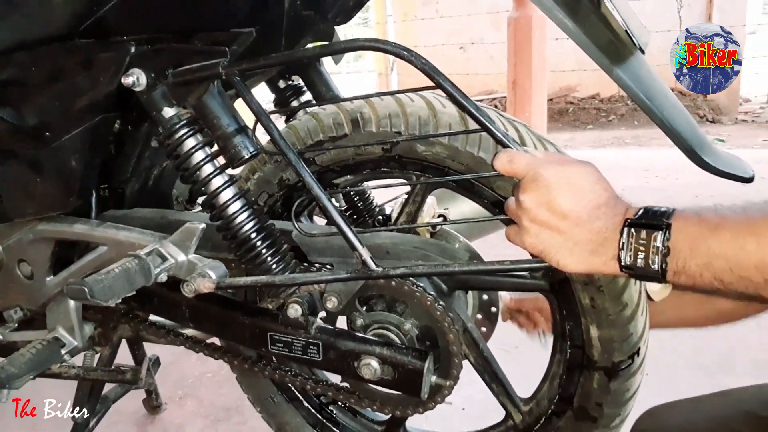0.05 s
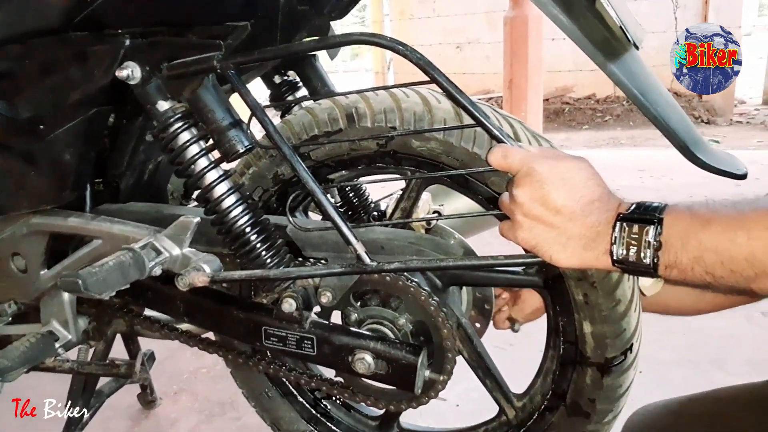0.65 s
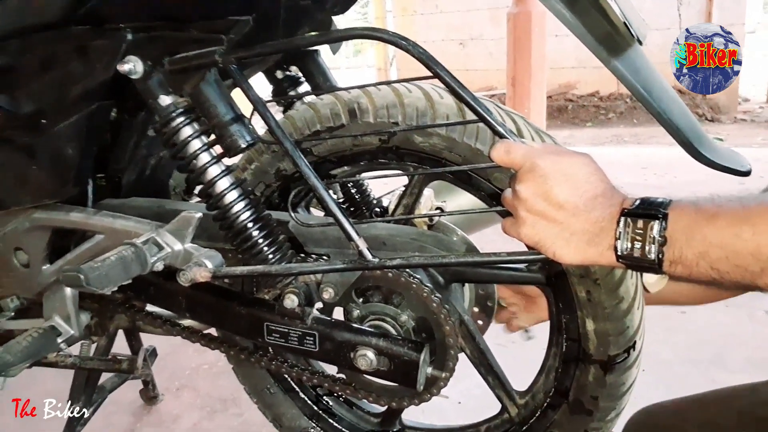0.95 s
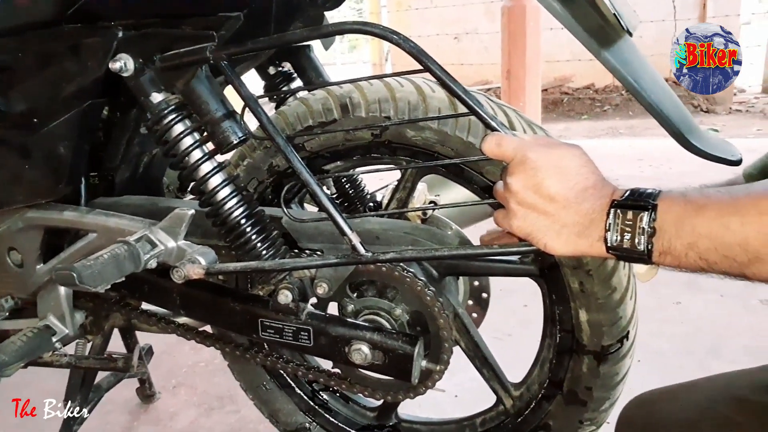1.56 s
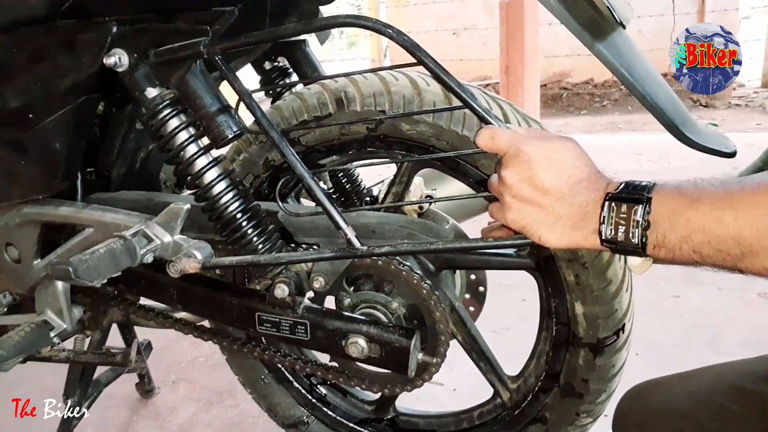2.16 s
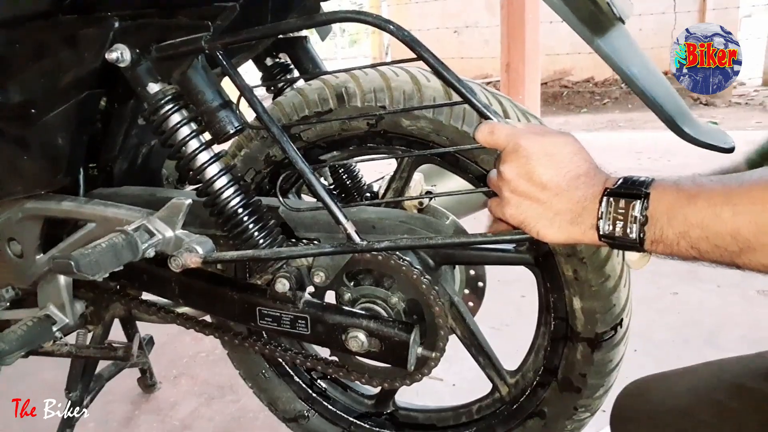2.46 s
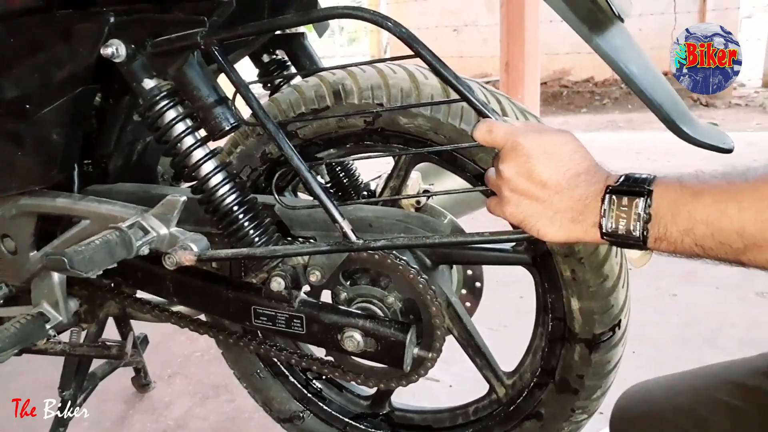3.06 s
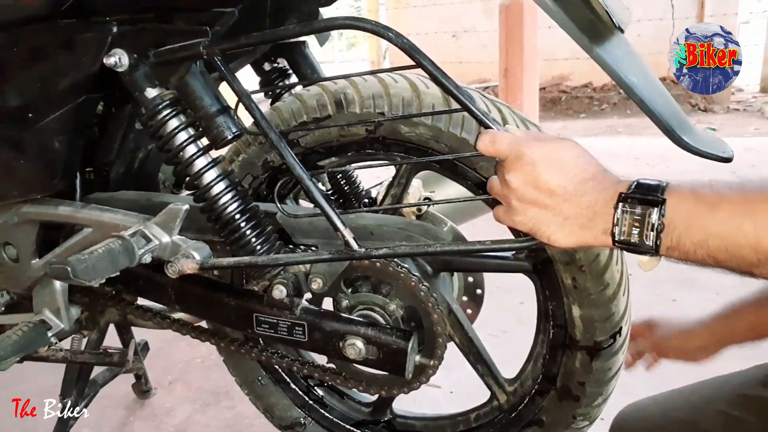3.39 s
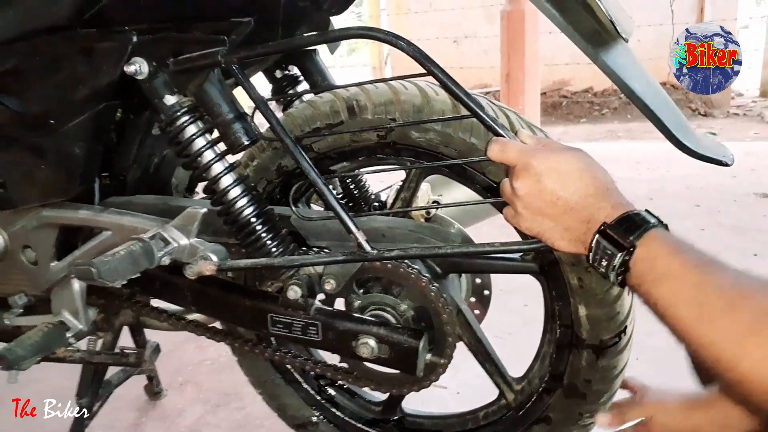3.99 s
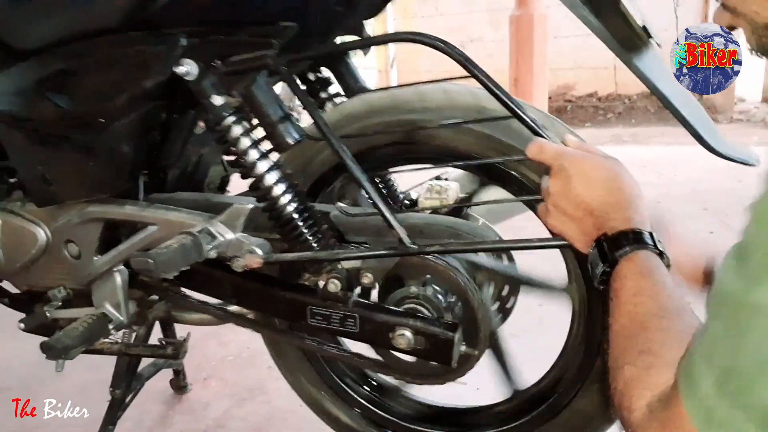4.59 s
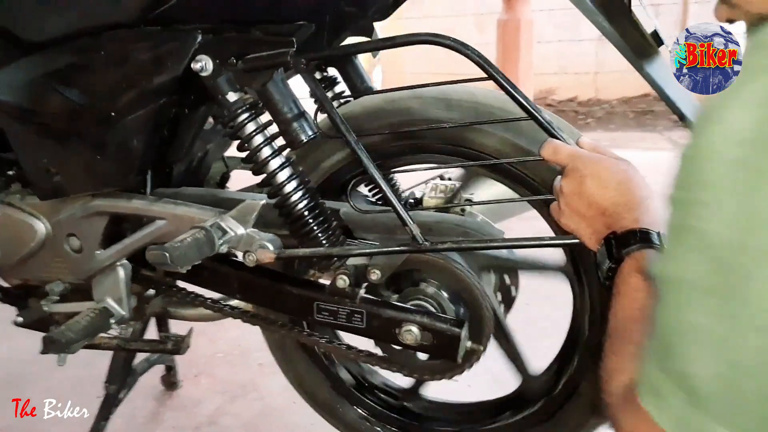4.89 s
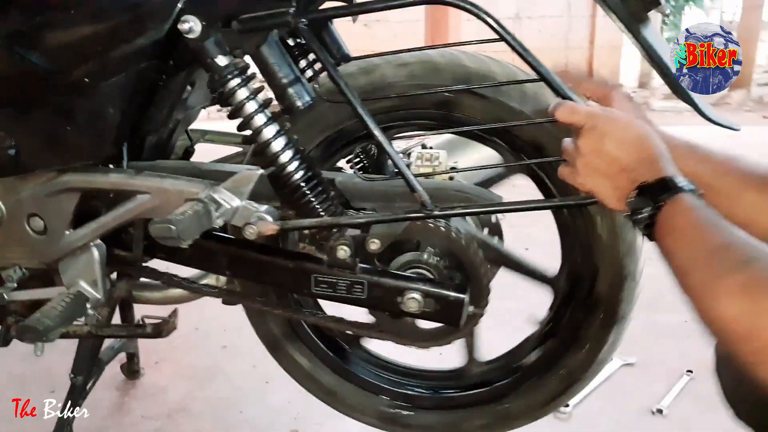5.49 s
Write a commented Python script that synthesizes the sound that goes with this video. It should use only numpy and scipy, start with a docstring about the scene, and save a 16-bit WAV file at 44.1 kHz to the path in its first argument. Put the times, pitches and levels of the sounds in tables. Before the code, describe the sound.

A low rumble of street traffic runs throughout and gradually swells, with a faint motor idling somewhere beyond a yard with a short echo. Close by, small steel parts of a motorcycle's brake linkage give light, dry clicks: two just after 1 second, a quick cluster at 1.4, one at 1.6 and a fainter one at 2.4. A soft, brief hollow tone passes at about 2 seconds. At 2.9 seconds a spanner drops against another on concrete; both chatter and ring high and bright, with a slight gritty scrape, settling by about 3.6. The traffic dips briefly as it lands, then swells again. From about 4.1 seconds the rear wheel is spun by hand and the chain runs over the sprocket, building to full speed at 5 seconds. This low, rasping, fluttering whirr, with the metalwork droning along, is the loudest sound and continues to the end near 5.6 seconds.

```python
"""Street traffic rumbles, small metal parts click, a dropped spanner rings, then a chain whirrs.
A motorcycle stands in an echoing yard beside the street, and a motor idles somewhere beyond.
Fingers work at the rear brake linkage, whose steel parts click. One spanner falls against
another on the concrete and both ring. Then the rear wheel is spun by hand: the chain runs over
the sprocket (the toothed wheel), shaking the swing arm and chain guard."""
import sys
import numpy as np
from scipy import signal
from scipy.fft import rfft, irfft, next_fast_len
from scipy.io import wavfile

SR = 44100
rng = np.random.default_rng(int(sys.argv[2]) if len(sys.argv) > 2 else 0)


def file_out(sig):
    """Save sig as 16-bit WAV at sys.argv[1]."""
    # one column per channel
    cols = np.atleast_2d(sig).T
    # limit, then scale
    lim = np.clip(cols, -1, 1)
    pcm = np.round(lim * 32767).astype(np.int16)
    wavfile.write(sys.argv[1], SR, pcm)


N = 244314
TIME = np.arange(N) / SR
FREQ = np.maximum(np.fft.rfftfreq(N, 1 / SR), 1)


def amp(db):
    """Turn decibels into a gain to multiply by."""
    return 10 ** (np.asarray(db) / 20)


def unit(x):
    """Scale a signal to an average strength (rms) of 1."""
    return x / np.sqrt(np.mean(x ** 2))


def response(points):
    """A gain for every frequency, drawn through points of f/Hz, gain/dB."""
    hz, db = np.transpose(points)
    return amp(np.interp(np.log(FREQ), np.log(hz), db))


def shape(x, gain):
    """Filter a sound with one gain for each frequency."""
    return irfft(rfft(x) * gain, N)


def brighten(x, db, corner_hz=900):
    """Raise or lower the treble by an amount that may change over time."""
    return x + (amp(db) - 1) * shape(x, 1 / (1 + (corner_hz / FREQ) ** 2))


def noise():
    """Two unrelated white noises."""
    return rng.standard_normal((2, N))


def wander(rate_hz):
    """A smooth random curve of typical size 1; a higher rate makes it move faster."""
    size = next_fast_len(N, real=True)
    smooth = np.exp(-(np.fft.rfftfreq(size, 1 / SR) / rate_hz) ** 2)
    return unit(irfft(rfft(rng.standard_normal(size)) * smooth, size)[:N])


def ramp(start, length):
    """Rise in a straight line from 0 to 1, then stay there."""
    return np.clip((TIME - start) / length, 0, 1)


def decay(start, t60):
    """The loudness of a blow: it jumps up, then fades by 60 dB every t60 seconds."""
    age = TIME - start
    return (age >= 0) * amp(-60 * np.clip(age / t60, 0, 4))


def ring(start, hz, t60):
    """One fading tone of a struck object."""
    return np.sqrt(2) * np.sin(2 * np.pi * hz * (TIME - start)) * decay(start, t60)


def resonate(x, bands):
    """Pick narrow humming bands out of a sound, each at its own level."""
    return sum(amp(db) * unit(shape(x, 1 / (1 + ((FREQ - hz) / width) ** 2))) for hz, width, db in bands)


def pan(db):
    """Left and right gains, with the left louder by db."""
    return amp(np.array([[db], [-db]]) / 2)


def spread(pair):
    """Turn two unrelated sounds into stereo: bass alike in both ears, treble all around."""
    # stereo width: f/Hz, side minus mid/dB
    widths = [(60, -24), (125, -23), (250, -13), (500, -6.5), (1000, 0.5), (2000, 0.5), (12000, 0)]
    # lean to one ear: f/Hz, left minus right/dB
    leans = [(60, -1.2), (250, -1.2), (500, 2.2), (1000, -.4), (2000, -1.5), (12000, 0)]
    width, lean = response(widths), np.sqrt(response(leans))
    mid, side = shape(pair, np.array([np.ones_like(width), width]) / np.hypot(1, width))
    return shape(np.array([mid + side, mid - side]), np.array([lean, 1 / lean]))


def yard(x, t60, echo_db, delay_s=0.0098):
    """House walls send back a short, blurred echo."""
    tail = noise() * decay(delay_s, t60)
    tail /= np.sqrt(np.sum(tail ** 2, axis=1, keepdims=True))
    return x + amp(echo_db) * signal.fftconvolve(x, tail, axes=1)[:, :N]


def motor(fade_db_per_s=-1.5):
    """A motor idles beyond the yard; its hum slowly fades behind the traffic."""
    # the motor's hum: f/Hz, half width/Hz, starting level/dB
    hums = [(82.5, 1.5, -40.5), (332, 2, -50.5)]
    return spread(resonate(noise(), hums)) * amp(fade_db_per_s * TIME)


def street(swell_db_per_s=3.5, boom_db_per_s=1.0, treble_db_per_s=0.92, swell_end_s=4.1,
           drop_s=2.96, boom_return_s=0.31, boom_hz=110):
    """Traffic rumble swells, drops once just after the spanner lands, and swells on."""
    # tone colour of the traffic: f/Hz, gain/dB
    colour = [(25, -28), (48, -10), (70, 3.5), (105, 1), (170, -3), (300, -8.5), (600, -15.5),
              (1250, -23.5), (2000, -33), (2800, -36.5), (4000, -47), (5500, -47.5), (12500, -61.5),
              (15500, -74)]
    # hum of a distant engine: f/Hz, half width/Hz, level against the rumble/dB
    engine_hum = [(82.1, 4.7, -7), (253.6, 2.4, -12), (332.9, 3.5, -15), (387.8, 6.2, -19), (509, 47, -18),
                  (682, 4, -23)]
    elapsed = np.minimum(TIME, swell_end_s)
    drop_db = 5.5 * ramp(drop_s, 0.033)
    upper_db = -38 + swell_db_per_s * elapsed - drop_db
    # the deep boom swells less and comes back soon after the drop
    boom_dip_db = drop_db * np.exp(-((TIME - drop_s) / boom_return_s) ** 2)
    boom_db = -39.5 + boom_db_per_s * elapsed - boom_dip_db
    rumble = unit(shape(noise(), response(colour))) + resonate(noise(), engine_hum)
    deep = shape(rumble, 1 / (1 + (FREQ / boom_hz) ** 8))
    upper = brighten(rumble - deep, treble_db_per_s * elapsed) * amp(upper_db)
    boom = deep * amp(boom_db + 1.5 * wander(rate_hz=3))
    return spread((upper + boom) * amp(0.5 * wander(rate_hz=14)))


def hollow_note():
    """A soft, hollow note comes and goes while the fingers work."""
    # the note: middle t/s, half length/s, f/Hz, half width/Hz, level/dB
    note = (2, 0.1, 542, 22, -37.5)
    middle, length, hz, width, db = note
    return spread(resonate(noise(), [(hz, width, db)])) * np.exp(-((TIME - middle) / length) ** 2)


def steel_clicks(knee_hz=2700, rebound_s=0.0035, rebound_db=-4, rise_s=0.0018, echo_t60=0.48):
    """Small steel parts click and rebound once: a dry crack and a short, damped ring."""
    # clicks of the brake linkage; the last is the spanner's light first touch before it rings:
    # t/s, level/dB, treble tilt/dB per octave, left minus right/dB, crack t60/s,
    # ring level/dB, ring length/share of the undamped ring
    clicks = [(0.004, -52, 1.5, -4.5, 0.48, -26, 1), (1.0735, -28.5, -5, 1.5, 0.045, -1, 1),
              (1.138, -28, 0, -1.5, 0.04, 2.5, 1), (1.380, -41, 1, -1, 0.045, 0, .8),
              (1.3945, -24, -7, 2, 0.032, -8, .4), (1.400, -35.5, 0, -5, 0.025, 2.5, .7),
              (1.6355, -35, 12, 0, 0.055, 4.5, .8), (2.397, -41, 0, -7, 0.07, -3, .6),
              (2.893, -41, 1, -10, 0.065, -10, .6)]
    # tone colour of a crack: f/Hz, gain/dB
    crack_colour = [(300, -5), (700, -1), (1150, 1), (1650, 5), (2000, -1), (2550, .5), (3400, -8),
                    (3950, -21), (4730, -7), (5100, -16), (5500, -12), (6300, -14), (7200, -21),
                    (8900, -14), (10000, -21), (11200, -23), (12000, -31), (12600, -23), (13400, -33),
                    (15500, -45)]
    # tones of the clicking steel: f/Hz, level/dB, t60/s
    tones = [(1600, -17, 0.035), (1715, -25, 0.3), (2600, -24, 0.04), (3350, -27, 0.03), (4715, -6, 0.034),
             (8900, -33, 0.08)]
    cracks, rings = 0, 0
    for start, db, tilt_db, pan_db, t60, ring_db, ring_share in clicks:
        blow = amp(db) * pan(pan_db) * ramp(start, rise_s)
        colour = response(crack_colour) * amp(tilt_db * np.log2(np.maximum(FREQ / knee_hz, 1)))
        contact = np.hypot(decay(start, t60), amp(rebound_db) * decay(start + rebound_s, t60))
        cracks += blow * shape(noise() * contact, unit(colour))
        for hz, tone_db, tone_t60 in tones:
            treble_db = tilt_db * np.log2(max(hz, knee_hz) / 5000)
            rings += blow * amp(ring_db + tone_db + treble_db) * ring(start, hz, tone_t60 * ring_share)
    return yard(cracks, echo_t60, echo_db=-5) + yard(rings, echo_t60, echo_db=-13)


def clunk():
    """Short, dull notes as the spanner's ends meet the ground."""
    # the notes: t/s, f/Hz, t60/s, level/dB
    notes = [(2.916, 3476, 0.06, -41), (2.914, 262, 0.043, -34), (2.957, 792, 0.23, -36.5),
             (2.957, 3780, 0.091, -46.5)]
    return sum(amp(db) * ring(start, hz, t60) for start, hz, t60, db in notes)


def ringing_steel(tones, blows, rest_s, rest_t60, free_share, catch_s=3.015, catch_db=0,
                  waver_hz=3, flicker_db=2.2):
    """Each blow feeds a spanner's tones; they waver with the contact and are damped once it lies flat."""
    sound = 0
    for hz, end_db, flat_db, t60, pan_db in tones:
        kicks = np.zeros(N)
        for start, db, flat in blows:
            kicks[int(start * SR)] += amp(db + np.interp(flat, [0, 1], [end_db, flat_db])) ** 2
        kept_per_sample = amp(-60 / (t60 * SR)) ** 2
        energy = signal.lfilter([1], [1, -kept_per_sample], kicks + 1e-20)
        # catching on the ground turns the ring so far down by catch_db (0 leaves it alone)
        caught = energy[int(catch_s * SR)] * decay(catch_s, t60) ** 2
        lost = caught * ramp(catch_s, .01) * (1 - amp(catch_db) ** 2)
        strength = np.sqrt(2 * np.abs(energy - lost))
        cycles = np.cumsum(hz + waver_hz * wander(rate_hz=25)) / SR + rng.random()
        wobble = wander(rate_hz=14)
        right_cycles = cycles - .22 - .08 * wobble  # the right ear lags a little
        tone = np.sin(2 * np.pi * np.array([cycles, right_cycles]))
        sound += pan(pan_db) * strength * tone * amp(flicker_db * wobble)
    settling = amp(-60 * np.maximum(TIME - rest_s, 0) / rest_t60)
    return sound * (free_share + (1 - free_share) * settling)


def rocking(start_s=3.42, period_s=0.17, depth=0.5):
    """A gain that makes the ring of a settling spanner fade and return in a slow beat."""
    age = np.maximum(TIME - start_s, 0)
    return 1 - depth * np.sin(np.pi * age / period_s) ** 2


def spanners(chatter_db=1.7, grain_db=4, slip_s=3.45, slip_width_s=0.028):
    """One spanner is dropped against another: both ring and chatter, and steel scrapes over grit."""
    # knocks: t/s, dropped one's ring/dB, lying one's ring/dB, tick/dB, landing (0 end first, 1 flat)
    bounces = [(2.9161, -31, -46, -31, 0), (2.9348, -26, -46, -29, 0), (2.947, -40, -48, -37, 0),
               (2.956, -40, -42, -42, 0), (3.027, -41, -45, -39, 1), (3.040, -36, -48, -42, 1),
               (3.062, -36, -54, -52, 1), (3.089, -38, -56, -38, 1), (3.172, -42, -54, -60, 1)]
    # dropped spanner's tones: f/Hz, struck end first/dB, struck flat/dB, t60/s, left minus right/dB
    dropped_tones = [(3447, -30, -25, .75, 4), (5858, -16, -17, .45, -4), (6920, -36, -27, .4, 0),
                     (8450, -29, -20, .25, 6), (8823, -23, -25, .7, 14), (8926, -5.5, -12, .62, 15),
                     (9104, -23, -8, .52, 14), (10060, -32, -23, .2, 6), (12350, -27, -16.5, .3, 3),
                     (12722, -2.5, -6, .4, 3), (12826, -18, -19, .4, 4), (13000, -24, -17.5, .38, 4)]
    # lying spanner's tones: same columns
    lying_tones = [(4931, -22, -25, 3.2, 3), (5028, -8, -21, .4, 8), (5085, -28, -17, .5, 4),
                   (5206, -21, -15, .6, 8), (8134, -4.5, -4, .6, 1), (10810, -21, -11.5, .9, 9),
                   (13952, -9.5, -30, .33, 14), (14070, -26, -19, .7, 8), (14710, -12, -7, .95, 9),
                   (15390, -15, -14, .6, 7)]
    # tone colour of steel on concrete: f/Hz, gain/dB
    grit_colour = [(800, -27), (2900, -2), (3400, -6), (4200, -11), (4900, -1), (5800, 1.5), (6400, 1),
                   (7500, -13), (8700, 7), (11000, 2), (12600, 9), (13500, 0), (15500, -7)]
    starts, dropped_db, lying_db, tick_db, flat = np.transpose(bounces)
    dropped = ringing_steel(dropped_tones, list(zip(starts, dropped_db, flat)),
                            rest_s=3.25, rest_t60=0.35, free_share=0.2, catch_db=-18)
    lying = ringing_steel(lying_tones, list(zip(starts, lying_db, flat)),
                          rest_s=3.3, rest_t60=0.5, free_share=0.8)
    rings = (dropped + lying * rocking()) * amp(chatter_db * wander(rate_hz=70))
    ticks = sum(amp(db) * decay(start, t60=0.016) for start, db in zip(starts, tick_db))
    slide = amp(-46) * decay(starts[1], t60=1)
    slip = amp(-67) * np.exp(-((TIME - slip_s) / slip_width_s) ** 2)  # one last slip as it settles
    scrape = (slide + slip) * amp(grain_db * wander(rate_hz=150))
    grit = unit(shape(noise(), response(grit_colour))) * (ticks + scrape)
    return yard(rings + grit * pan(db=4), t60=0.52, echo_db=-9)


def chain(start_s=4.12, full_speed_s=5.05, slowing_per_s=0.07, links_per_s=105, whirr_db=-16.8,
          scatter_db=3.0, rasp_share=0.081, rub=0.95, flutter_db=0.6):
    """Each chain roller lands on a tooth with a short rasp; the slack flutters and the frame drones."""
    # tone colour of chain and sprocket: f/Hz, gain/dB
    colour = [(25, -31), (50, -21), (72, -6.5), (130, -5.5), (290, -6), (420, -11.5), (520, -12.5),
              (900, -19.5), (1250, -21), (2000, -31), (2800, -33), (4000, -44.5), (5500, -44), (15500, -57)]
    # drones of the shaken frame: f/Hz, half width/Hz, level against the whirr/dB
    drones = [(82.5, 5, -6), (110, 8, -15), (186, 9, -16), (253, 4.5, -4.5), (292, 9, -16), (342, 6, -17),
              (463.7, 5, -21), (505, 11, -19)]
    # the wheel is pushed up to full speed (1), then coasts
    coasting_s = np.maximum(TIME - full_speed_s, 0)
    speed = ramp(start_s, full_speed_s - start_s) ** 0.7 * np.exp(-slowing_per_s * coasting_s)
    strength = amp(whirr_db) * speed ** 2  # impacts grow with the square of the speed
    links_passed = np.cumsum(links_per_s * speed * (1 + 0.022 * wander(rate_hz=30))) / SR
    hit_size = amp(scatter_db * rng.standard_normal(N))[links_passed.astype(int)]  # one for each link
    rasps = hit_size * np.exp(-(links_passed % 1) / rasp_share)
    rollers = noise() * unit(rub + rasps)
    whirr = unit(shape(rollers, response(colour))) * amp(flutter_db * wander(rate_hz=12))
    treble_db = 5.0 * (1 - speed) + 3.5 * ramp(full_speed_s, 0.28)  # brighter when slow or slack
    return spread((brighten(whirr, treble_db) + resonate(rollers, drones)) * strength)


def scene():
    """The street and the chain, with small metal sounds and a faint motor."""
    return street() + chain() + steel_clicks() + spanners() + clunk() + hollow_note() + motor()


def record(dry, notch_hz=7650, notch_width_hz=760, notch_db=-14, top_hz=15650):
    """Soften one narrow band of treble, fade in quickly and cut off the very highest sounds."""
    notch = amp(notch_db * np.exp(-((FREQ - notch_hz) / notch_width_hz) ** 2))
    sound = shape(dry, notch) * ramp(0, .005) ** 2
    low_pass = signal.ellip(10, .2, 80, top_hz, fs=SR, output="sos")
    return signal.sosfilt(low_pass, sound)


dry = scene()
out = record(dry)
file_out(out)
```